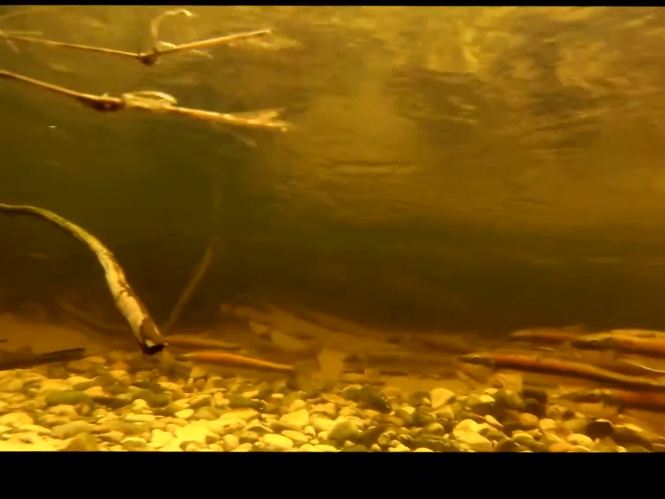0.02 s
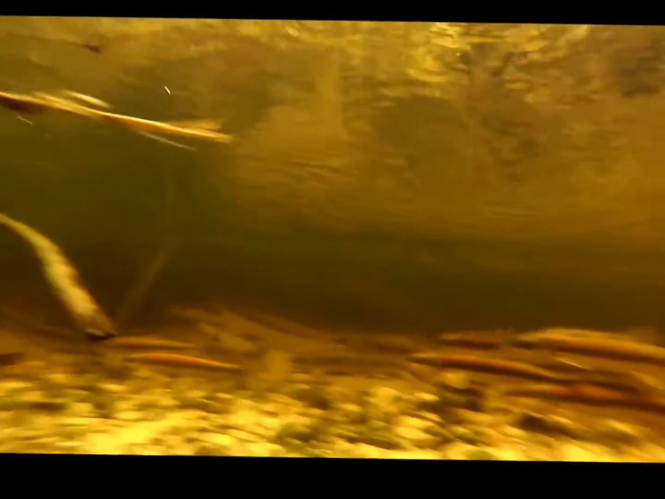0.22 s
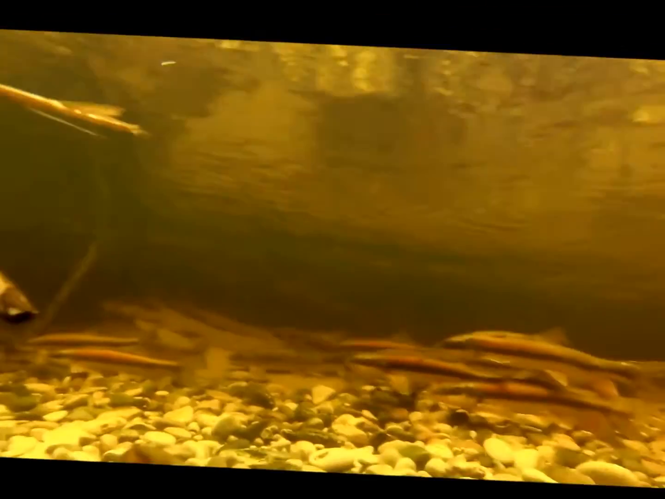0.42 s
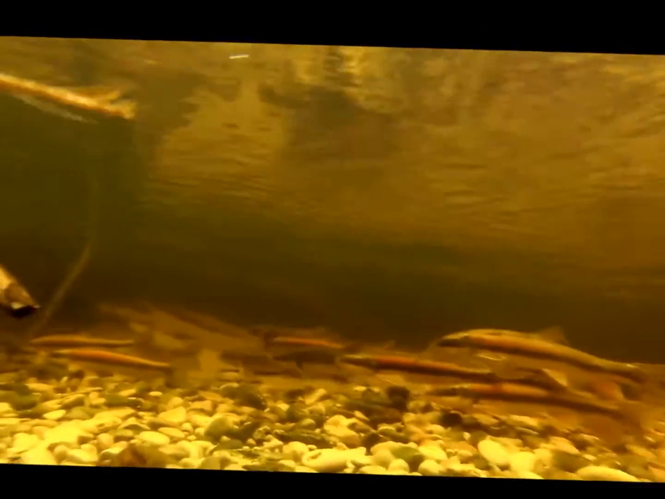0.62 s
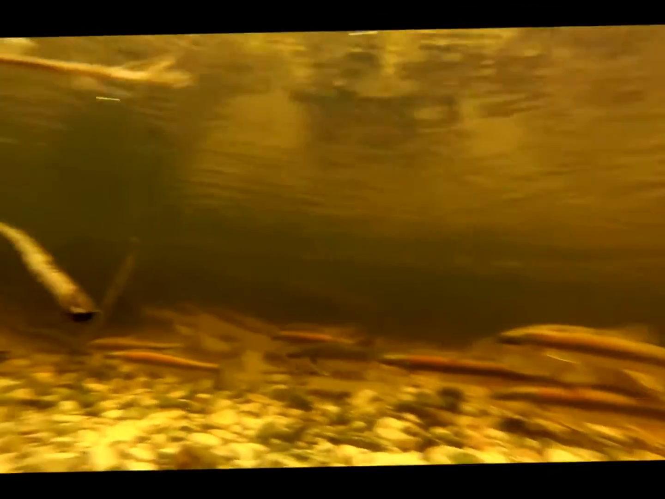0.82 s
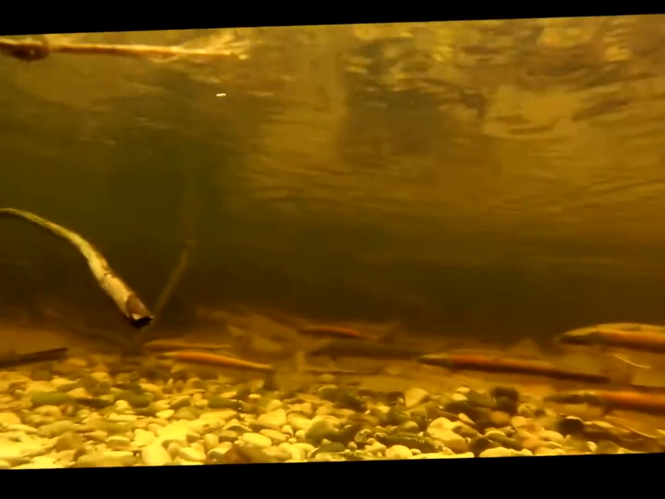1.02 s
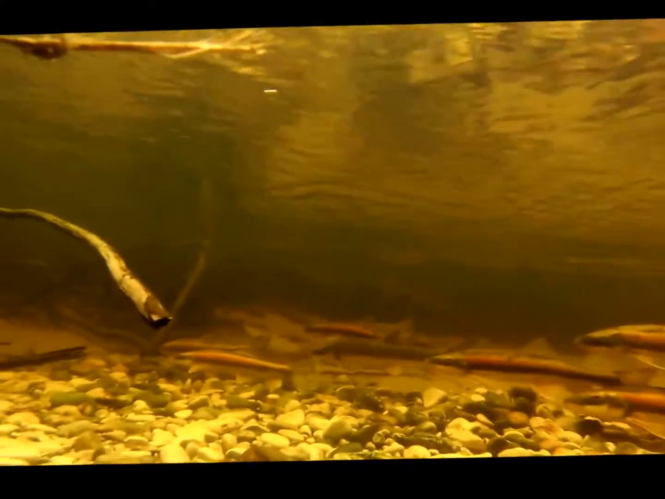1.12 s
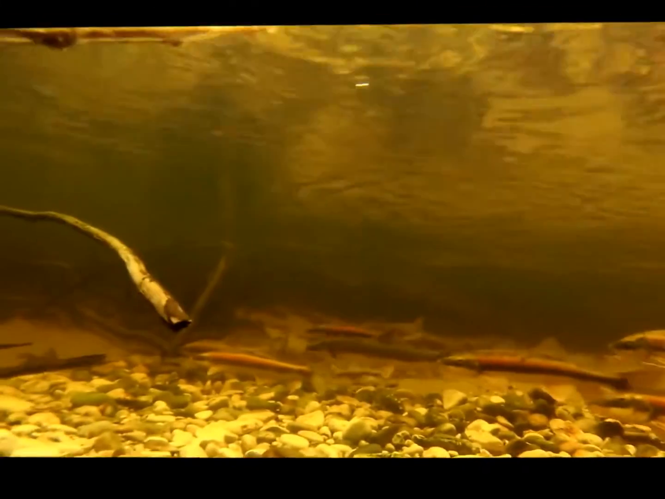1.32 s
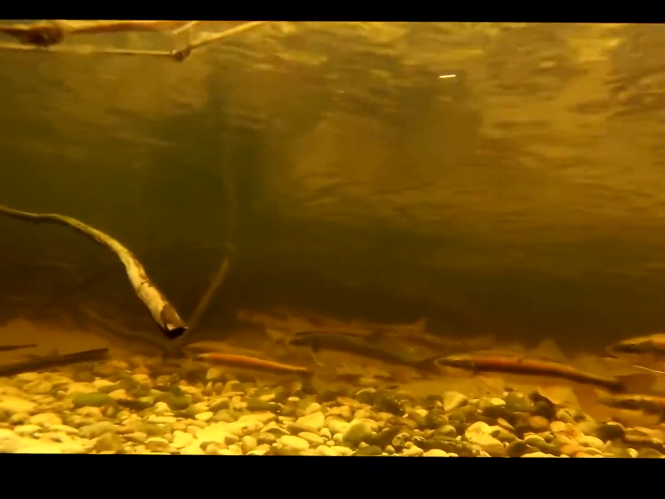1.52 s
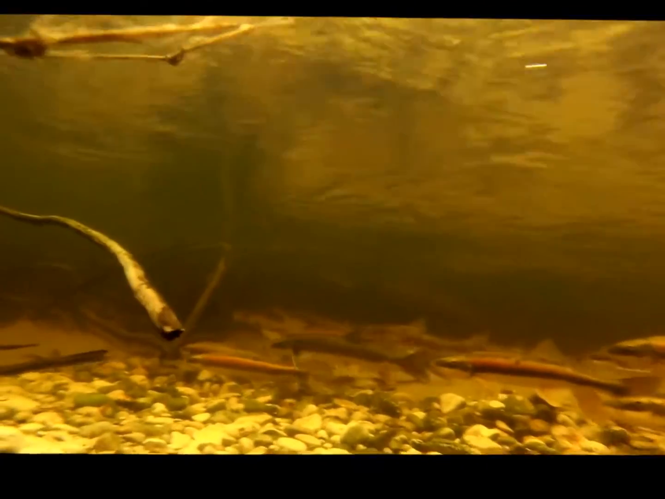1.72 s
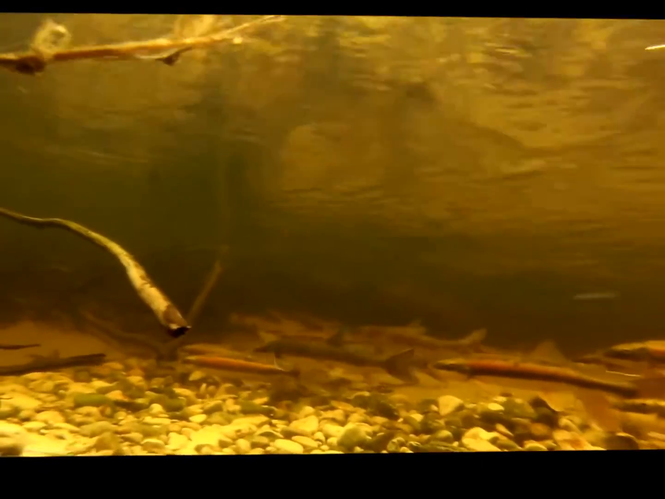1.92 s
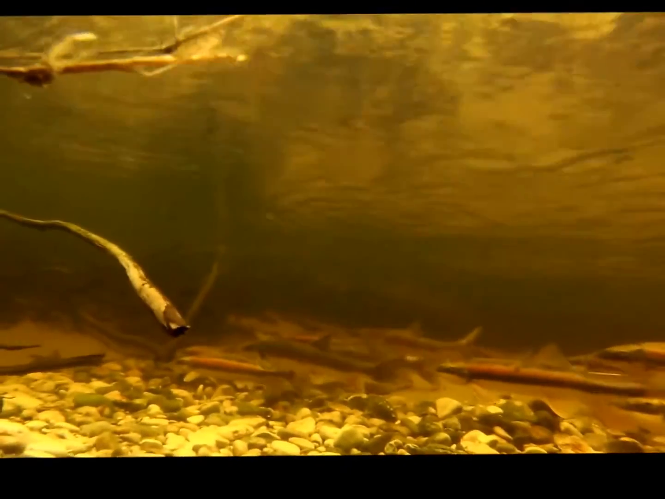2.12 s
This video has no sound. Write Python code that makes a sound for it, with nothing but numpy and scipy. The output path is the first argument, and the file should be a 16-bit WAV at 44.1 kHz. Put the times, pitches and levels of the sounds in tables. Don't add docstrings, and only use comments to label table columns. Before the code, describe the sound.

Close, dry, damped clacks and scrapes of a plastic shell on creek stones, with fine sand ticks and a faint low water rumble; sharp double knock early, scraping cluster midway, hard thud late, then fading clicks.

```python
import sys
import numpy as np
from scipy import signal
from scipy.fft import rfft, irfft
from scipy.io import wavfile

SR = 44100
rng = np.random.default_rng(int(sys.argv[2]) if len(sys.argv) > 2 else 0)


def nominal_scale(level):
    x = np.asarray(level, float) / 20
    return 10 ** x


def wav_out(sig):
    wavfile.write(sys.argv[1], SR, np.round(np.clip(np.atleast_2d(sig).T, -1, 1) * 32767).astype(np.int16))


N = 97020

# (frequency [Hz], level [dB], t60 [s])
SHELL_MODES = [(156, -6, 0.014), (266, -1.5, 0.03), (385, -8, 0.04), (482, 0, 0.028), (630, 0.5, 0.025),
               (779, -0.5, 0.021), (1070, -2, 0.023), (1200, -9, 0.022), (1620, -3, 0.014),
               (2180, 2, 0.012), (2900, -14, 0.014), (3357, -16, 0.0146), (3866, -14.5, 0.0072)]
# (frequency [Hz], level [dB], t60 [s])
PORT_MODES = [(3430, 11.5, 0.0064), (5150, 0.5, 0.0058), (6590, -1, 0.0051), (7600, -4, 0.005),
              (9700, -1, 0.0029), (11680, -7.5, 0.0033), (13100, -15, 0.0044)]


def evened(x):
    return x / np.sqrt(np.mean(x ** 2) + 1e-20)


def along(table, column=1):
    rows = np.array(table)
    return np.interp(np.arange(N) / SR, rows[:, 0], rows[:, column])


def add(mix, start_s, sound):
    part = mix[round(start_s * SR):][:len(sound)]
    part += sound[:len(part)]


def slow_noise(corner_hz):
    f = np.fft.rfftfreq(N, 1 / SR)
    lowpass = (f > 0) / (1 + (f / corner_hz) ** 4)
    return evened(irfft(rfft(rng.standard_normal(N)) * lowpass, N))


def ring(modes, favour_hz=None, longer=1, favour_oct=0.22, contact_s=0.0001):
    scatter_db, favour_db, detune = 2, 9.5, 0.012
    hz, db, t60 = np.transpose(modes)[:, :, None]
    luck = rng.standard_normal((3, len(modes), 1))
    t = np.arange(2200) / SR
    db = db + scatter_db * luck[0]
    if favour_hz:
        octaves = np.log2(hz / favour_hz)
        db = db + favour_db * np.exp(-(octaves / favour_oct) ** 2)
        db = db - 3 * np.maximum(octaves - 1, 0)
        db = db - 3 * np.maximum(-octaves - 0.5, 0) ** 1.5
    decay = nominal_scale(db - 60 * t / (t60 * longer))
    swing = np.sin(2 * np.pi * hz * (1 + detune * luck[2]) * t)
    partials = np.sign(luck[1]) * decay * swing
    return partials.sum(0) * (1 - np.exp(-t / contact_s))


def bounces(length, count, spread_s, level_db):
    hits = np.zeros(length)
    when, size = rng.random((2, count))
    np.add.at(hits, (when * spread_s * SR).astype(int), nominal_scale(level_db) * (2 * size - 1))
    hits[0] = 1
    return hits


def rubbing(modes, per_s, spread_db, level_db, favour_hz=None, spots=12):
    struck = rng.random(N) < per_s / SR
    size = nominal_scale(spread_db * np.minimum(rng.exponential(1, N), 4)) * struck
    spot = rng.integers(0, spots, N)
    grains = np.zeros(N)
    for k in range(spots):
        strikes = size * (spot == k) * nominal_scale(level_db)
        response = evened(ring(modes, favour_hz, favour_oct=0.45))
        grains += signal.oaconvolve(strikes, response)[:N]
    return grains / np.sqrt(2200 * np.mean(size ** 2))


def water():
    # (frequency [Hz], density [dB per Hz])
    hiss_spectrum = [(100, -7.5), (500, 2.5), (1100, -19), (2200, -39), (4300, -29), (8000, -30.5),
                     (12400, -33.5), (16000, -35)]
    # (time [s], level [dB])
    surge_curve = [(0.0, -40), (0.02, -41.5), (0.2, -49.5), (0.24, -28), (0.3, -38.5), (0.46, -44.5),
                   (0.55, -53.5), (0.63, -47), (0.9, -35.5), (1.1, -54), (1.14, -43), (1.59, -51.5),
                   (1.67, -45.5), (1.71, -27), (1.83, -41), (2.06, -46.5), (2.16, -60), (2.2, -56)]
    hiss_db, surge_db, rumble_hz = -53, 1.5, 81.6
    hz, density_db = np.transpose(hiss_spectrum)
    log_hz = np.log(np.fft.rfftfreq(N, 1 / SR) + 1)
    colour = nominal_scale(np.interp(log_hz, np.log(hz + 1), density_db))
    hiss = evened(irfft(rfft(rng.standard_normal(N)) * colour, N))
    rumble = nominal_scale(along(surge_curve) + surge_db) * slow_noise(rumble_hz)
    return nominal_scale(hiss_db) * hiss + rumble


def scraping():
    # (time [s], pressure [dB], extra sand [dB])
    scrape_curve = [(0, -51.5, -16), (.05, -48, -16), (.12, -58, 10), (.22, -32.5, -1.5), (.36, -27.5, 4.5),
                    (.43, -36, 1), (.47, -46, 6.5), (.6, -46, 12.5), (.63, -39, 10), (.74, -36.5, 5),
                    (.8, -24.5, 11.5), (.91, -28, 7), (1.02, -48.5, -1), (1.18, -42, 3.5), (1.67, -45.5, 8),
                    (1.71, -36.5, 7.5), (1.92, -32, 5.5), (2.08, -52, 9.5)]
    clump_db, clump_hz, sand_db = 2.2, 45, -26
    press_db = along(scrape_curve) + clump_db * slow_noise(clump_hz)
    grit = rubbing(SHELL_MODES, per_s=4000, spread_db=3.1, level_db=press_db, favour_hz=1435)
    sand_press_db = press_db + along(scrape_curve, column=2) + sand_db
    sand = rubbing(PORT_MODES, per_s=900, spread_db=3.2, level_db=sand_press_db)
    return grit + sand


def knocks():
    # (time [s], peak [dB], favoured mode [Hz], ring length [factor])
    pebble_knocks = [(.004, -36.5, 290, 0.77), (0.047, -32.5, 463, 0.94), (.126, -39, 1130, .7),
                     (.15, -35.5, 517, 0.5), (.186, -55, 690, 1), (.207, -27.5, 616, 0.6),
                     (.222, -21, 1160, 1.07), (0.2446, -6.5, 630, 0.803), (0.2482, -2.5, 1070, 1.15),
                     (0.2646, -16.5, 800, 0.48), (.273, -21, 2180, 1.3), (.282, -17.5, 550, 1.59),
                     (0.2886, -4, 587, 0.72), (0.2912, -4, 1070, 1.2), (.42, -23, 1620, 0.664),
                     (0.438, -16, 1710, 0.812), (.622, -22, 1200, 1.04), (0.719, -31, 1130, 2.2),
                     (.759, -15.5, 1130, 0.76), (.796, -19, 1070, 0.91), (0.818, -16.5, 524, 0.56),
                     (.824, -12, 1140, 0.85), (0.835, -10.5, 1230, 1.26), (0.928, -19.5, 660, 1),
                     (0.977, -23, 2410, 0.758),
                     (1.021, -36, 490, 1.6), (1.056, -32, 488, 0.49), (1.182, -23, 1620, 0.53),
                    (1.245, -26.5, 489, 0.72), (1.299, -24.5, 2180, 1), (1.402, -28, 2180, 0.99),
                    (1.428, -24, 710, 0.91), (1.452, -24.5, 2180, 1.1), (1.462, -20.5, 2180, 0.4),
                    (1.467, -22, 1600, 0.89), (1.593, -29, 710, 1.18), (1.675, -28.5, 460, 0.66),
                    (1.6985, -16, 1200, 0.55), (1.7023, -16, 660, 0.47), (1.716, -19.5, 1960, 0.97),
                    (1.725, -24, 1600, 0.967), (1.78, -17.5, 1600, 1.3), (1.797, -21, 1070, 1.16),
                    (1.887, -20, 450, 0.92), (1.899, -19, 1070, 0.96), (1.911, -21, 580, 0.84),
                    (1.941, -21, 2180, 0.6), (2.058, -41, 1090, 1.9), (2.108, -43, 1104, 1.14),
                    (1.195, -32.5, 800, 1.2), (1.27, -33, 1590, .8), (1.608, -28, 1070, 1.06),
                    (1.936, -14.5, 1600, 0.76), (1.959, -16, 1620, 0.6), (1.974, -23.5, 1590, 0.82),
                    (2.017, -29.5, 524, 0.9), (2.052, -32.5, 1050, 1.8), (2.101, -31.5, 1090, 1.05),
                    (2.14, -35.5, 730, 1.4), (2.175, -35, 607, 1.12), (2.197, -19, 640, 0.5),
                    (.882, -19, 1070, 1.06), (.9, -20.5, 1100, 1.02), (1.525, -31.5, 640, 0.94),
                    (1.545, -34, 1600, .8), (.353, -22, 640, 1.1), (.395, -24, 800, 1.05)]
    knock_db, thump_db, thump_hz, wall_hz = 0.92, -55, 45, 5600
    out = np.zeros(N)
    t = np.arange(3000) / SR
    thump = np.sin(2 * np.pi * thump_hz * t) * np.exp(-t / 0.0096)
    for s, db, hz, longer in pebble_knocks:
        hits = bounces(1500, 4, longer * 0.004, level_db=-4)
        sound = np.convolve(hits, ring(SHELL_MODES, hz, longer, contact_s=0.4 / hz))
        add(out, s, nominal_scale(db + knock_db) * sound / abs(sound).max())
        add(out, s, nominal_scale(db + thump_db) * thump)
    return signal.sosfilt(signal.butter(3, wall_hz, fs=SR, output="sos"), out)


def ticks():
    # (time [s], peak [dB], favoured mode [Hz])
    sand_ticks = [(0.1257, -39, 5140), (0.2064, -45, 4890), (0.2254, -32, 5240), (0.244, -21.5, 4730),
                  (0.2882, -24.5, 4850), (0.437, -33.5, 6700), (0.4755, -34.5, 4860), (0.626, -53, 5350),
                  (0.6469, -51, 5530), (0.7444, -35, 4930), (0.783, -29, 6580), (0.7953, -26, 4970),
                  (0.8121, -37.5, 5210), (0.8315, -26, 5150), (0.8804, -23.5, 5100), (0.9046, -26.5, 5300),
                  (0.9268, -56, 5000), (0.9639, -29, 4800), (1.0205, -46.5, 5490), (1.2519, -50, 5250),
                  (1.302, -40, 5230), (1.49, -39, 4970), (1.569, -39, 5300), (1.7253, -38.5, 5040),
                  (1.758, -36, 6600), (1.192, -41, 5200), (1.6, -41, 6600), (1.612, -42, 5200),
                  (1.905, -47, 7500), (2.055, -44, 5600), (0.855, -40, 6600), (.893, -32, 7500),
                  (0.2504, -35.5, 5170), (0.2648, -41, 4970), (0.295, -32.5, 5060), (0.8004, -38, 5500),
                   (0.8364, -27, 4500), (0.8454, -34, 5210), (0.8684, -28, 5040), (0.995, -39.5, 6640),
                   (1.459, -40, 5090), (1.778, -27, 5330), (1.7992, -31.5, 5320), (1.8317, -66, 5160),
                   (1.858, -31.5, 5410), (1.8864, -29.5, 5200), (1.936, -33, 5430), (1.9592, -30.5, 5452),
                   (1.974, -31, 6500), (1.9864, -46, 5410), (2.047, -45, 5800), (2.099, -44, 4550),
                   (2.1595, -42, 4740)]
    # (time [s], peak [dB], favoured mode [Hz])
    bright_snaps = [
        (1.693, -31, 9700),
        (1.393, -46, 11500),
        (1.408, -32, 11500),
        (1.4135, -29, 11500),
        (1.467, -32, 9700),
        (.976, -29, 9700),
        (1.225, -42, 7500),
        (1.507, -45, 9700),
        (1.582, -44, 7500),
    ]
    tick_db = -2
    out = np.zeros(N)
    for s, db, hz in [*sand_ticks, *bright_snaps]:
        hits = bounces(600, 3, 0.0055, level_db=-6)
        sound = np.convolve(hits, ring(PORT_MODES, hz, favour_oct=0.6))
        add(out, s, nominal_scale(db + tick_db) * sound / abs(sound).max())
    return out


def cracks():
    # (time [s], peak [dB], frequency [Hz])
    wall_cracks = [(.1257, -45, 3380), (.2225, -28.5, 3450), (.2455, -14.5, 3350), (.2515, -23, 3300),
                   (.2655, -34, 3220), (.2892, -12, 3450), (.2955, -18, 3030), (.437, -29, 2960),
                   (.762, -29, 3370), (.785, -38, 3480), (.798, -31, 3520), (.819, -27, 3380),
                   (.836, -40, 3530), (.878, -28, 3530), (.928, -29, 3500), (.964, -38, 3220),
                   (.977, -28.5, 3400), (1.182, -47, 3086), (1.301, -44, 3221), (1.462, -44, 3300),
                   (1.779, -34, 3600), (1.937, -37, 3460), (1.96, -38, 3500), (2.1, -45, 3250)]
    t60_s, rise_s = 0.0076, 0.00047
    out = np.zeros(N)
    t = np.arange(900) / SR
    rise = 1 - np.exp(-t / rise_s)
    for s, db, hz in wall_cracks:
        add(out, s, nominal_scale(db + 4 - 60 * t / t60_s) * np.sin(2 * np.pi * hz * t) * rise)
    return out


def slam():
    # (frequency [Hz], level [dB], t60 [s])
    slam_modes = [(330, -14, 0.012), (700, -1, 0.011), (1180, -16, .03), (1600, 0, 0.0105),
                  (2130, 0, 0.008), (2980, -18, .008), (3600, -16, .007), (4500, -25, .006),
                  (5500, -30, .006)]
    # (time [s], peak [dB], frequency [Hz], t60 [s])
    dull_rebound = (1.7115, -10, 420, .016)
    slam_s, turn_hz = 1.693, 1400
    out = np.zeros(N)
    t = np.arange(2200) / SR
    blow = np.zeros(len(t))
    for hz, db, t60 in slam_modes:
        sign = np.sign(turn_hz - hz)
        blow += sign * nominal_scale(db - 60 * t / t60) * np.sin(2 * np.pi * hz * t)
    blow *= 1 - np.exp(-t / 0.0012)
    add(out, slam_s, blow / abs(blow).max())
    s, db, hz, t60 = dull_rebound
    rise = 1 - np.exp(-t / 0.0008)
    add(out, s, nominal_scale(db + 4 - 60 * t / t60) * np.sin(2 * np.pi * hz * t) * rise)
    return out


def scene():
    return (water() + scraping() + knocks() + ticks() + cracks() + slam())[None]


def band_limit(x):
    return signal.sosfilt(signal.butter(12, 16120, fs=SR, output="sos"), x)


def record(dry):
    ceiling, edge_hz = 1.0, 15600
    held = dry * np.minimum(ceiling / abs(dry).max(), 1)
    faded = held * np.minimum(np.arange(N)[::-1] / 30, 1)
    limited = signal.oaconvolve(faded, signal.firwin(255, edge_hz, fs=SR)[None], "same")
    return band_limit(limited)


dry = scene()
out = record(dry)
wav_out(out)
```